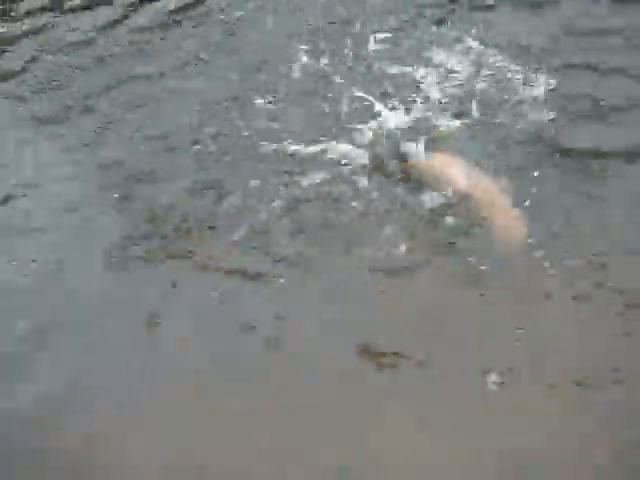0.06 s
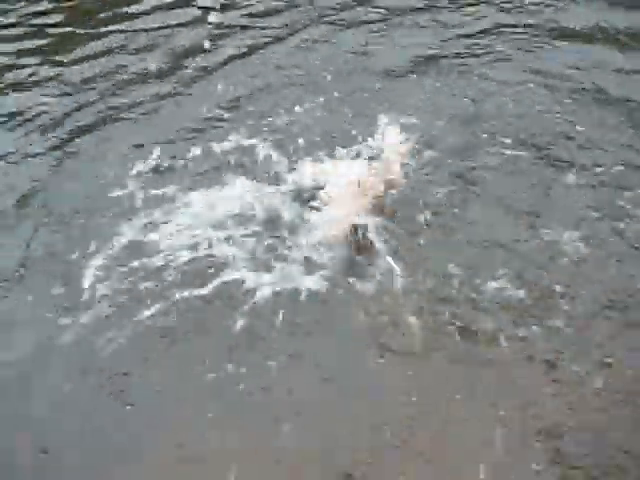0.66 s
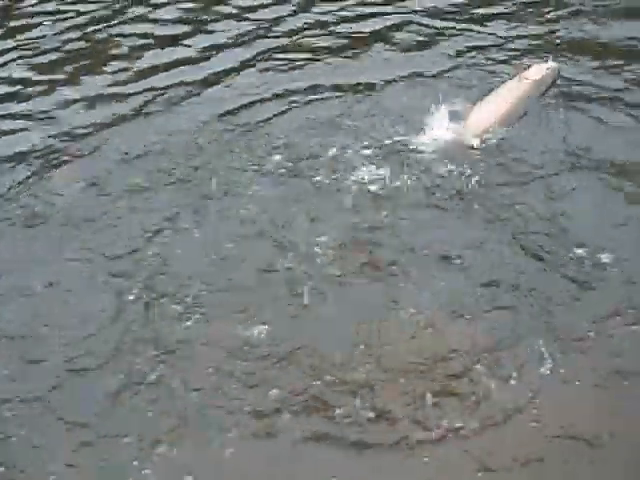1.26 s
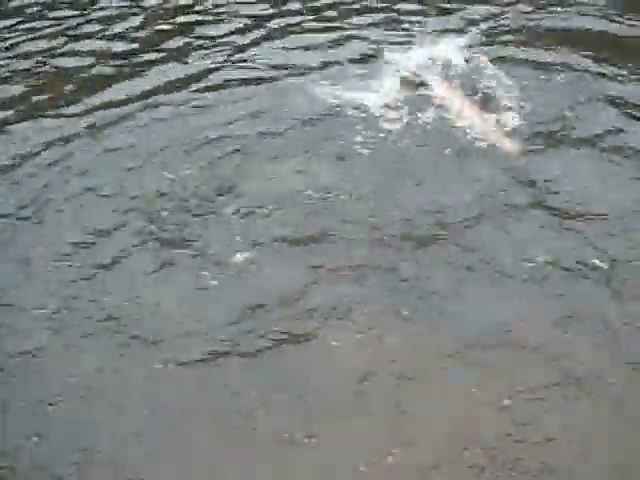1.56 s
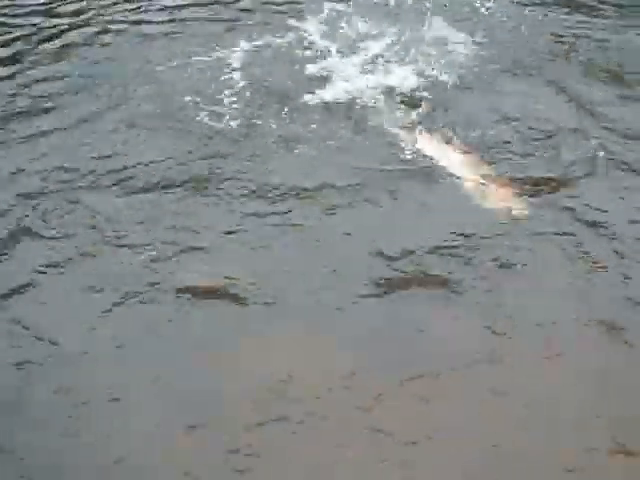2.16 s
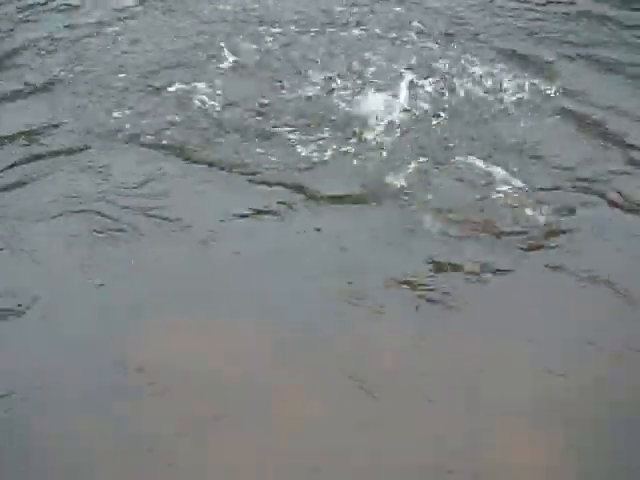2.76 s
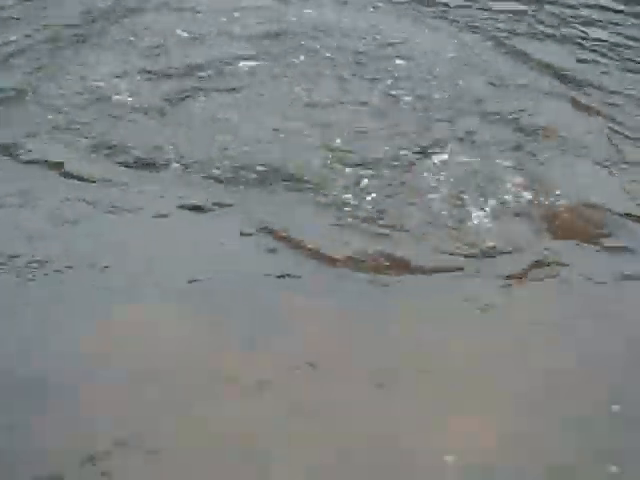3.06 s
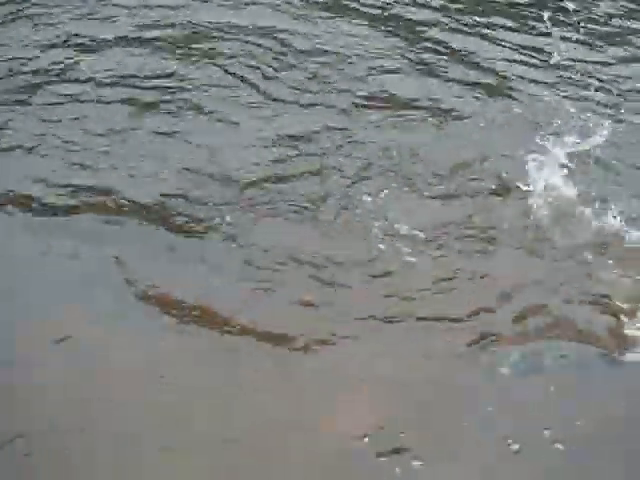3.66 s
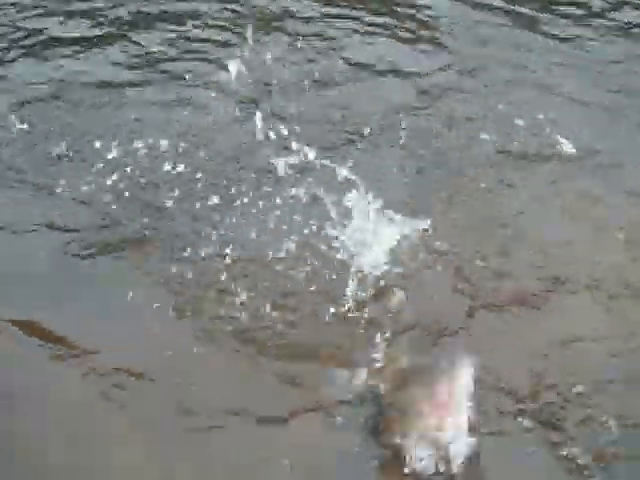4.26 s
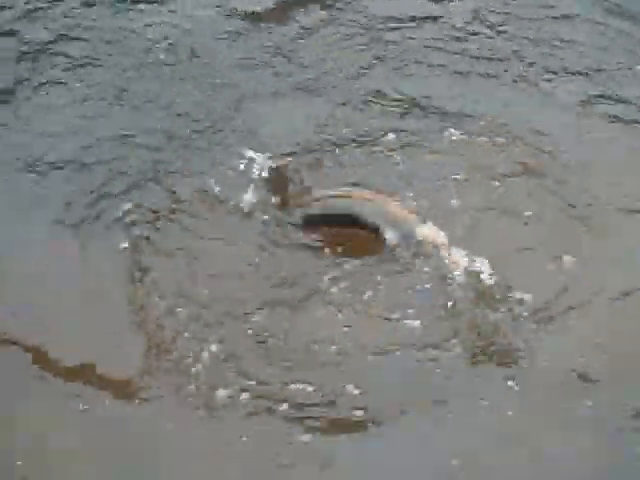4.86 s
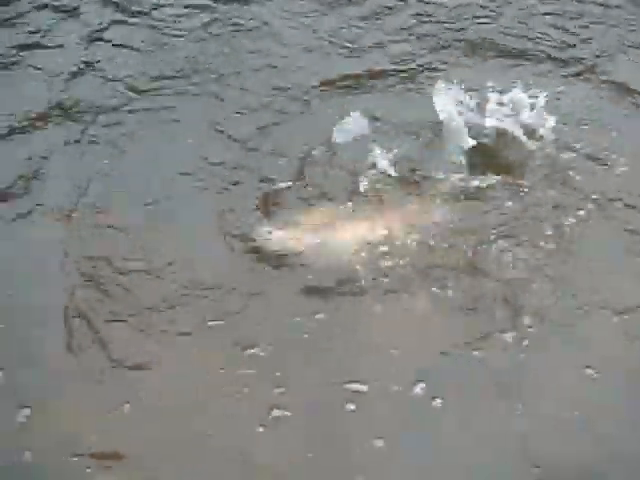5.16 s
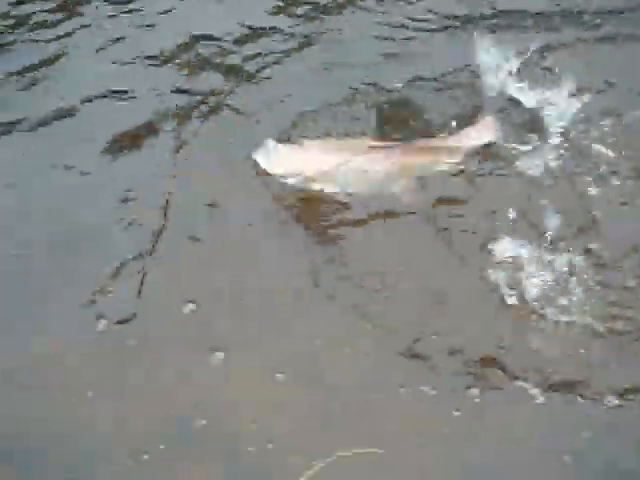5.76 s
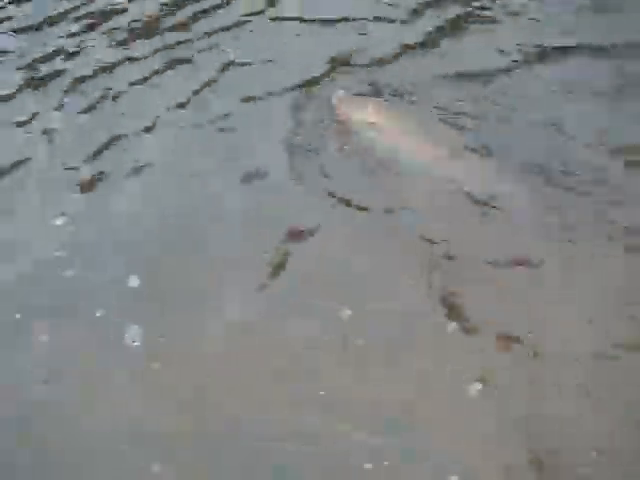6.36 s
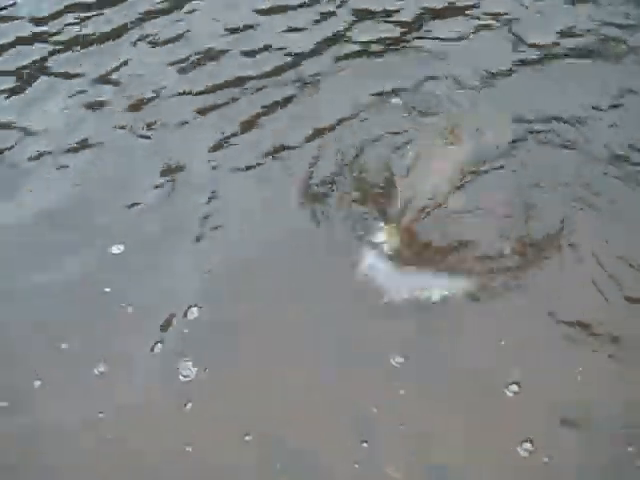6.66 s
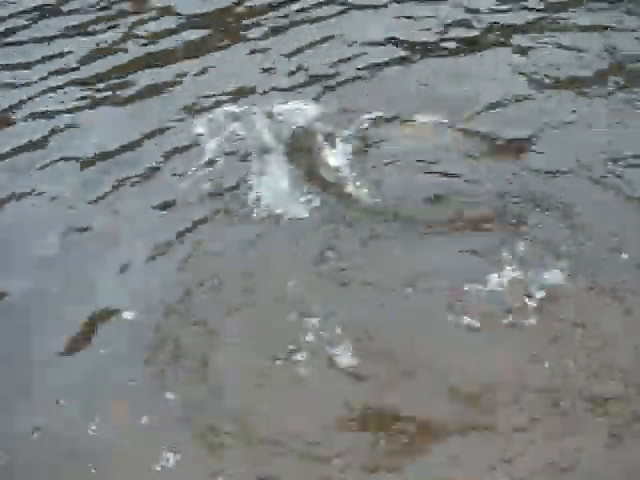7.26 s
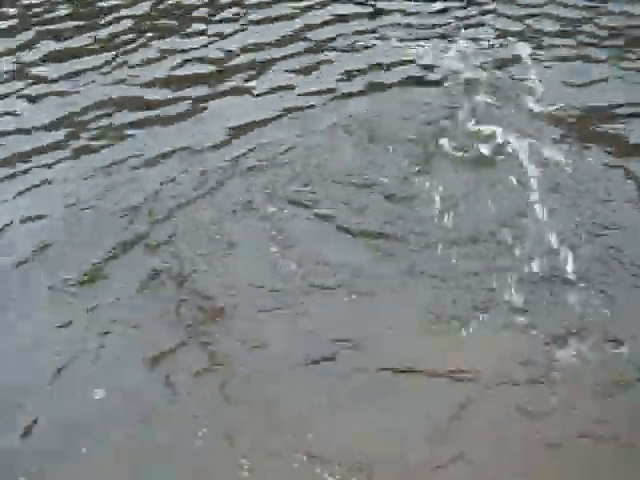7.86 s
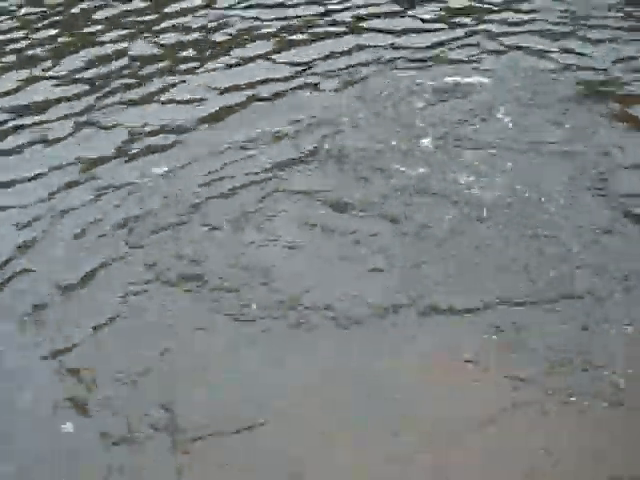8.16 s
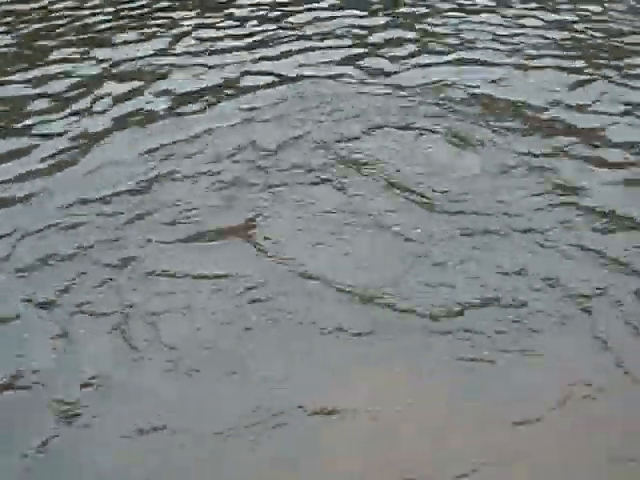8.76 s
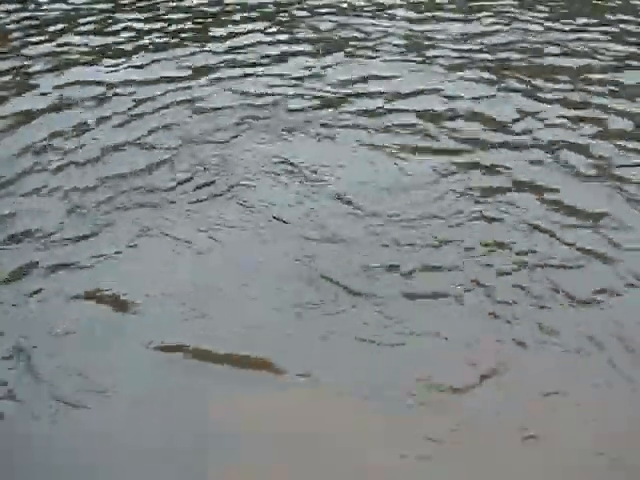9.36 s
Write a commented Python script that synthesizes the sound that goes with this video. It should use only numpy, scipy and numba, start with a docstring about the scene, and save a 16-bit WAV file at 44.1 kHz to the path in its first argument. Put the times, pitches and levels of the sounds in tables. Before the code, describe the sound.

A fish thrashes at a river's surface in irregular splashes, slaps and bubbly pops, with light wind on the microphone.

```python
"""A hooked fish thrashes at the surface of a river, a few metres from a small microphone on the bank.
Its tail throws splashes and slaps, trapped air pops and gulps, and the churned water fizzes
with tiny bubbles and falling drops over the faint wash of the river. Wind buffets the microphone,
which is narrow in band, favours the range near 3 kHz and overloads on the hardest slap."""
import sys
import numpy as np
from scipy import signal
from scipy.fft import rfft
from scipy.io import wavfile
from scipy.ndimage import uniform_filter1d
from numba import njit

SR = 44100
rng = np.random.default_rng(int(sys.argv[2]) if len(sys.argv) > 2 else 0)


def wrap_up_sound(samples):
    """Save the sound to the file named by the first command line argument, as 16-bit audio."""
    columns = np.atleast_2d(samples).T
    # keep every value between -1 and 1, then stretch to whole-number steps
    tamed = np.clip(columns, -1, 1)
    steps = np.round(tamed * 32767).astype(np.int16)
    wavfile.write(sys.argv[1], SR, steps)


N = 414528
TIME = np.arange(N) / SR
TOP_HZ = 5310  # upper edge of the microphone's band

# spectrum of small bubbles, with the microphone's colour: f/Hz, level/dB
FIZZ_SPECTRUM = [(700, -36), (1200, -15.5), (1600, -18), (2100, -5), (2700, -4), (3150, 1), (3500, 0),
                 (4000, 0.5), (4700, -4), (5400, -11.5)]
# spectrum of large bubbles, with the microphone's colour: f/Hz, level/dB
SLOSH_SPECTRUM = [(200, -12), (350, -5), (600, -6), (850, -2.5), (1000, 0.5), (1140, 6), (1340, -3.5),
                  (1550, 3), (1800, -13), (2500, -21)]


def undb(db):
    """Decibels to gain."""
    return 10 ** (np.asarray(db) / 20)


def unit(x):
    """Scale to rms 1."""
    return x / np.sqrt(np.mean(x ** 2) + 1e-18)


def add(out, s, sound):
    """Mix a sound in at s seconds."""
    start = max(int(s * SR), 0)
    part = sound[:max(N - start, 0)]
    out[start:start + len(part)] += part


def colour(x, spectrum):
    """Filter a sound by a curve of (f/Hz, level/dB) points; rms 1."""
    hz, db = np.transpose(spectrum)
    f = np.maximum(np.fft.rfftfreq(len(x), 1 / SR), 1)
    gain = undb(np.interp(np.log(f), np.log(hz), db))
    return unit(np.fft.irfft(rfft(x) * gain, len(x)))


def band(x, hz, octaves):
    """Keep a bell-shaped band around a pitch, cut off above TOP_HZ; rms 1."""
    f = np.maximum(np.fft.rfftfreq(len(x), 1 / SR), 1)
    bell = 1 / (1 + (np.log2(f / hz) / octaves) ** 2)
    high_cut = 1 / (1 + (f / TOP_HZ) ** 20)
    low_cut = f / (f + hz / 10)
    return unit(np.fft.irfft(rfft(x) * bell * high_cut * low_cut, len(x)))


def wander(per_s):
    """A random curve that heads for a new value per_s times a second; rms 1."""
    knots = rng.standard_normal(N // 100)
    return unit(np.interp(TIME * per_s, np.arange(len(knots)), knots))


def even(x, seconds):
    """Hold a texture near rms 1 over a span, keeping its finer grain."""
    power = uniform_filter1d(x ** 2, max(int(seconds * SR), 1))
    return x / np.sqrt(np.abs(power) + 1e-9)


def swell(length):
    """Time and envelope of a bubble that peaks at 0.7 of length seconds and dies away."""
    t = np.arange(int(6 * length * SR) + 200) / SR
    age = 1.43 * t / length
    return t, (age * np.exp(1 - age)) ** 2


@njit
def ring(starts, hz, cycles, gains, glide):
    """Damped bubbles whose pitch rises by the fraction glide as they near the surface."""
    out = np.zeros(N)
    for k in range(len(starts)):
        life, phase = cycles[k] * SR / hz[k], 0.
        for i in range(min(int(life), N - starts[k])):
            phase += 2 * np.pi * hz[k] * (1 + glide * i / life) / SR
            out[starts[k] + i] += gains[k] * np.exp(-5 * i / life) * np.sin(phase)
    return out


def bubbles(count, low_hz, high_hz, median_cycles, spread_db, glide):
    """A cloud of bubbles at random moments: many faint, a few strong; rms 1."""
    when, pitch, life, strength = rng.random((count, 4)).T
    starts = (when * N).astype(np.int64)
    hz = low_hz + (high_hz - low_hz) * pitch
    cycles = median_cycles * (.5 + 2 * life ** 2)
    gains = undb(-spread_db * np.log(0.0074 + strength))
    return unit(ring(starts, hz, cycles, gains, glide))


def bout_envelope(start, length):
    """Foam builds, holds while the fish thrashes, then settles into a drizzle of falling drops."""
    rise_s, settle_db_per_s = 0.044, 109
    drizzle_db, drizzle_db_per_s = -7, 15.5
    rise = np.clip((TIME - start) / rise_s + 1, 0, 1)
    after = np.maximum(TIME - start - length, 0)
    return rise * undb(np.maximum(-settle_db_per_s * after, drizzle_db - drizzle_db_per_s * after))


def agitation():
    """Gains of fizz and of slosh: the liveliest bout rules, over a faint lapping."""
    # bouts of thrashing: t/s, length/s, fizz level/dB, slosh level/dB
    bouts = [(0.0, 0.048, -22.5, -45.5), (0.25, 0.23, -29, -47), (0.415, 0.37, -25.5, -42),
             (0.778, 0.28, -25, -50), (1.17, 0.18, -32.5, -47.5), (1.543, 0.3, -34.5, -43),
             (1.839, 0.17, -28, -43.5), (2.112, 0.15, -26, -45.5), (2.37, 0.23, -28, -47),
             (2.67, 0.22, -30.5, -45), (2.931, 0.12, -34.5, -42), (3.413, 0.56, -34, -46.5),
             (3.905, 0.15, -30, -43.5), (4.142, 0.2, -29.5, -44.5), (4.36, 0.22, -27.5, -41),
             (4.706, 0.21, -38, -49.5), (5.228, 0.33, -34.5, -43.5), (5.607, 0.19, -34.5, -39),
             (5.929, 0.12, -33, -44.5), (6.216, 0.15, -43, -49.5), (6.783, 0.22, -38, -50),
             (7.062, 0.47, -35, -48), (7.726, 0.25, -39, -49), (7.948, 0.22, -35, -51)]
    fizz, slosh = undb(-54), undb(-53.5)  # lapping between bouts
    for start, length, fizz_db, slosh_db in bouts:
        shape = bout_envelope(start, length)
        fizz = np.maximum(fizz, shape * undb(fizz_db))
        slosh = np.maximum(slosh, shape * undb(slosh_db))
    return fizz, slosh


def churn():
    """Small bubbles fizz and larger ones slosh in spurts; as the water calms, single drops stand out."""
    fizz_gain, slosh_gain = agitation()
    spurts = wander(per_s=50)
    small = bubbles(22000, low_hz=993, high_hz=5270, median_cycles=20, spread_db=1.5, glide=0.11)
    drops = bubbles(1000, low_hz=1833, high_hz=4940, median_cycles=24, spread_db=4.0, glide=0.17)
    large = bubbles(7000, low_hz=234, high_hz=1843, median_cycles=8.3, spread_db=5.5, glide=0.35)
    chirps = bubbles(260, low_hz=1500, high_hz=3430, median_cycles=50, spread_db=1.5, glide=0.56)
    drop_share = np.interp(20 * np.log10(fizz_gain), [-40, -25], [.5, .25])
    fizz = np.sqrt(1 - drop_share) * colour(small, FIZZ_SPECTRUM)
    plinks = np.sqrt(drop_share) * colour(drops, FIZZ_SPECTRUM)
    spray = (fizz + plinks + undb(-12.5) * chirps) * undb(1.9 * spurts)
    slosh = colour(large, SLOSH_SPECTRUM) * undb(3.2 * spurts)
    return even(spray, seconds=.1) * fizz_gain + even(slosh, seconds=.12) * slosh_gain


def wind():
    """Eddies on the microphone rumble in uneven puffs; each gust swells and fades over the breeze."""
    # spectrum of wind on the microphone: f/Hz, level/dB
    buffet_spectrum = [(12, -11), (25, 4.5), (60, -0.5), (125, -2.5), (180, -5.5), (250, -15.5),
                       (400, -23.5), (700, -32.5), (1500, -55.5)]
    # breeze on the bank: t/s, level/dB (before a 1 dB lift)
    breeze = [(0.0, -45.5), (0.58, -34), (0.86, -43.5), (1.83, -48), (2.09, -39.5), (3.48, -47.5),
              (3.61, -39), (4.53, -32.5), (4.9, -38.5), (5.65, -38), (7.3, -48), (7.51, -44.5),
              (8.38, -48.5), (9.4, -39)]
    # gusts at their peaks: t/s, level/dB, half-length/s
    gusts = [(0.477, -32.5, 0.091), (0.85, -32.5, 0.025), (1.83, -35, 0.025), (3.162, -35, 0.059),
             (3.592, -33.5, 0.07), (4.185, -26.5, 0.043), (4.366, -33.5, 0.055), (4.997, -29.5, 0.037),
             (5.181, -29, 0.041), (5.345, -27, 0.03), (5.794, -31, 0.15), (7.407, -39, 0.024),
             (9.21, -26.5, 0.057)]
    s, breeze_db = np.transpose(breeze)
    power = undb(np.interp(TIME, s, breeze_db) + 1) ** 2
    for peak_s, db, half_length in gusts:
        power += undb(db) ** 2 * np.exp(-((TIME - peak_s) / half_length) ** 2)
    rumble = colour(rng.standard_normal(N), buffet_spectrum) * undb(3.6 * wander(per_s=22))
    return even(rumble, seconds=.15) * np.sqrt(power)


def river():
    """The steady, faint wash of the open water."""
    # spectrum of open water from the bank: f/Hz, level/dB
    wash_spectrum = [(20, 12), (60, -6.5), (200, -10), (400, -10), (700, -10.5), (1100, -12), (1600, -14),
                     (2400, -15), (3300, -14), (4300, -16), (5000, -14.5), (5400, -24)]
    wash = colour(rng.standard_normal(N), wash_spectrum)
    return wash * undb(-38.5 + 0.32 * wander(per_s=7.5))


def slaps_and_pops():
    """A crack as water meets water, the ring of the bubble it traps, and a little spatter."""
    # flat slaps on the surface: t/s, peak level/dB, centre f/Hz, length/s
    slaps = [(0.445, -8, 2200, 0.0016), (1.003, -12.5, 4360, 0.0029), (1.309, -14.5, 4160, 0.0033),
             (1.579, -16, 2650, 0.0034), (2.6484, -14, 4800, 0.00098), (2.864, -18, 2920, 0.0032),
             (4.0216, 2, 3680, 0.0044), (4.176, -14.5, 2400, 0.002), (5.359, -6.5, 2520, 0.0017),
             (5.481, -14.5, 3000, 0.0027), (5.854, -19.5, 3530, 0.0038), (6.016, -12.5, 3610, 0.0025),
             (7.134, -14.5, 2790, 0.0028), (7.352, -15.5, 3520, 0.0025), (8.13, -22, 3800, 0.0074)]
    # drops that trap a ringing bubble: t/s, peak level/dB, f/Hz, ring length/cycles
    pops = [(0.0518, -9, 3900, 6.4), (0.148, -14.5, 3800, 8), (0.5633, -3, 3140, 9),
            (0.688, -3.5, 3368, 14.4), (0.9141, -13.5, 3500, 11), (0.982, -9, 3710, 9.5),
            (1.053, -3.5, 3320, 11.3), (1.2328, -13, 3350, 4.4), (1.428, -20, 4230, 6),
            (1.692, -17, 3700, 7), (2.556, -14.5, 4370, 6.2), (2.7098, -14, 3500, 7.1),
            (2.949, -11, 3310, 7), (3.135, -19.5, 2700, 4.7), (3.308, -19.5, 2310, 11),
            (3.759, -17.5, 2860, 8.3), (3.885, -14.5, 3260, 12), (4.232, -15, 3180, 14),
            (4.3668, -5.5, 3270, 6.8), (4.4487, -3.5, 3190, 5.1), (4.4805, -8, 3370, 11),
            (4.596, -9.5, 3060, 6.3), (4.608, -14, 3080, 9.3), (4.821, -22, 3120, 4),
            (4.895, -20.5, 2430, 4.3), (5.011, -18, 2880, 5.9), (5.69, -14.5, 3200, 8),
            (6.256, -22.5, 3630, 9.5), (6.351, -29, 2240, 5.6), (6.7323, -12.5, 3130, 8.8),
            (6.823, -18, 3510, 8.5), (6.903, -12.5, 3380, 5.6), (6.921, -10, 2960, 6.5),
            (7.2562, -18, 4080, 7.6), (7.607, -23.5, 2690, 6.5), (8.38, -28.5, 2850, 7.5)]
    slap_crack, pop_crack = 0.59, 0.032  # share of crack against ring
    hits = [(s, db, hz, length, slap_crack) for s, db, hz, length in slaps]
    hits += [(s, db, hz, cycles / hz, pop_crack) for s, db, hz, cycles in pops]
    out, noise = np.zeros(N), rng.standard_normal(N)
    body = colour(rng.standard_normal(N), SLOSH_SPECTRUM)
    for s, db, hz, length, crack_share in hits:
        t, shape = swell(length)
        start = int(s * SR)
        tone = np.sin(2 * np.pi * hz * t * (1 + 0.0037 * (t / length - 1)))
        crack = band(noise[start:][:len(t)], hz, octaves=0.58)
        blend = np.sqrt(1 - crack_share) * tone + np.sqrt(crack_share) * crack
        hit = unit(shape * blend) * np.sqrt(np.mean(shape ** 2) / 2)
        # a flat slap also pushes the water below it, which adds a duller smack
        smack = undb(-19.5) * crack_share * shape * body[start:][:len(t)]
        spatter = undb(-22) * crack * (1 - np.exp(-t / length)) * (1 - t / t[-1])
        add(out, s - .25 * length, (hit + smack + spatter) * undb(db))
    return out


def splashes():
    """Each stroke tears the surface into a short, dense burst of crackle over a duller plunge."""
    # tail strokes and sheets of falling water: t/s, crackle level/dB, plunge level/dB, length/s
    strokes = [(0.279, -30.5, -45, 0.057), (0.446, -18, -33.5, 0.045), (0.544, -19.5, -37.5, 0.045),
               (0.681, -17, -34.5, 0.029), (0.967, -33, -47, 0.025), (1.058, -23, -49, 0.029),
               (1.534, -21, -48, 0.011), (1.661, -23.5, -41, 0.019), (1.812, -30, -42, 0.047),
               (1.932, -25, -40, 0.022), (1.991, -22.5, -49, 0.018), (2.227, -26, -41.5, 0.049),
               (2.359, -25.5, -40, 0.053), (2.514, -29.5, -42, 0.04), (2.641, -22, -37.5, 0.022),
               (3.005, -24.5, -40, 0.012), (3.536, -27.5, -34.5, 0.042), (3.816, -24.5, -41, 0.016),
               (4.008, -29, -46, 0.05), (4.171, -22, -37, 0.013), (4.279, -24, -43, 0.017),
               (4.353, -24, -42, 0.012), (4.485, -22, -36, 0.058), (4.552, -21.5, -49, 0.017),
               (4.718, -24, -51, 0.009), (5.203, -27, -55, 0.052), (5.327, -29.5, -37.5, 0.054),
               (5.661, -26, -33, 0.041), (6.006, -26, -30, 0.017), (6.718, -33, -50, 0.024),
               (6.891, -25, -48, 0.048), (7.055, -29, -39.5, 0.025), (7.163, -27.5, -44, 0.016),
               (7.249, -35, -36.5, 0.03), (7.479, -27.5, -49, 0.015)]
    balanced_hz, db_per_octave, attack_s = 2520, 52.5, 0.0008
    out = np.zeros(N)
    cloud = bubbles(30000, low_hz=935, high_hz=5420, median_cycles=22, spread_db=4.5, glide=0.087)
    crackle = colour(cloud, FIZZ_SPECTRUM)
    plunge = colour(rng.standard_normal(N), SLOSH_SPECTRUM)
    for s, crackle_db, plunge_db, length in strokes:
        t = np.arange(int(2 * length * SR) + 400) / SR
        start = int(s * SR)
        shape = (1 - np.exp(-t / attack_s)) / (1 + (t / length) ** 8)
        # a shallower stroke, with less plunge, traps smaller and brighter bubbles
        hz = balanced_hz * 2 ** ((crackle_db - plunge_db) / db_per_octave)
        burst = even(band(crackle[start:][:len(t)], hz, octaves=1.0), seconds=0.0049)
        add(out, s, shape * (burst * undb(crackle_db) + plunge[start:][:len(t)] * undb(plunge_db)))
    return out


def gulps():
    """A closing cavity shrinks, so its note slides upward: the longer it takes, the further it climbs."""
    # larger cavities closing: t/s, peak level/dB, first f/Hz, length/s
    cavities = [(0.4436, -13.5, 1030, 0.0031), (0.542, -24, 900, 0.0069), (1.032, -35, 1670, 0.0097),
                (1.273, -20.5, 1790, 0.0041), (3.051, -24.5, 856, 0.0099), (3.187, -24.5, 2750, 0.0033),
                (3.2, -33.5, 1680, 0.011), (3.352, -29.5, 980, 0.0029), (3.723, -19.5, 1890, 0.0034),
                (3.751, -23.5, 2030, 0.0065), (5.294, -22.5, 1760, 0.0066), (5.776, -26.5, 880, 0.0032),
                (6.001, -22.5, 933, 0.0076), (7.075, -26, 1600, 0.0095), (7.405, -27.5, 2230, 0.012),
                (8.331, -34, 1330, 0.0039)]
    out = np.zeros(N)
    for s, db, first_hz, length in cavities:
        t, shape = swell(length)
        climb_octaves = 62 * length
        hz = first_hz * 2 ** (climb_octaves * np.tanh(t / length / 1.3))
        add(out, s, undb(db) * shape * np.sin(2 * np.pi * np.cumsum(hz) / SR))
    return out


def scene():
    """Fish, water and wind at one microphone on the bank."""
    return (churn() + splashes() + slaps_and_pops() + gulps() + wind() + river())[None]


def record(dry):
    """The band below TOP_HZ overloads near full scale; a gentle lowpass softens the harsh top."""
    narrow = signal.sosfiltfilt(signal.ellip(6, .1, 45, TOP_HZ, fs=SR, output="sos"), dry)
    overloaded = np.clip(narrow, -.98, .98)
    softened = signal.sosfilt(signal.butter(2, 8000, fs=SR, output="sos"), overloaded)
    return signal.sosfilt(signal.ellip(8, .2, 70, 15500, fs=SR, output="sos"), softened)


dry = scene()
out = record(dry)
wrap_up_sound(out)
```